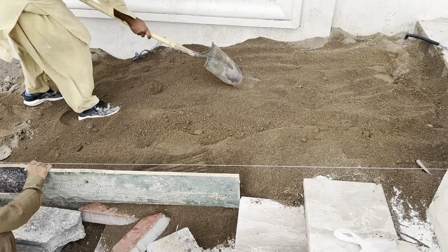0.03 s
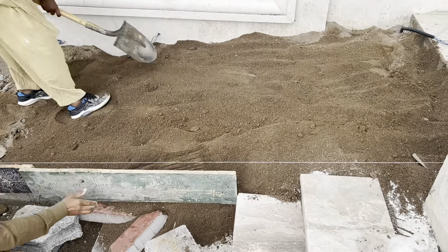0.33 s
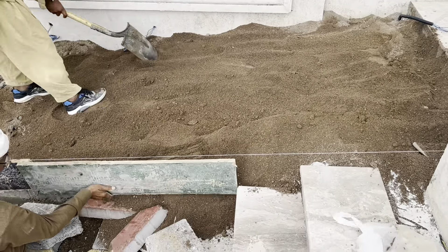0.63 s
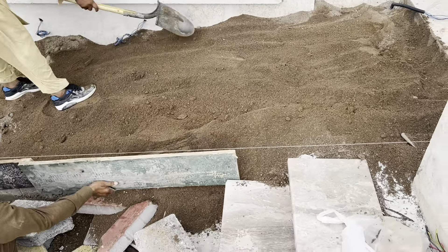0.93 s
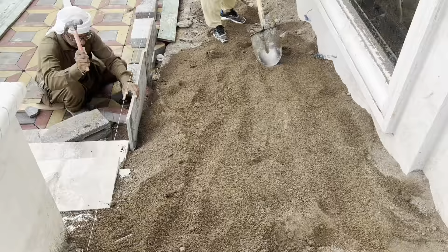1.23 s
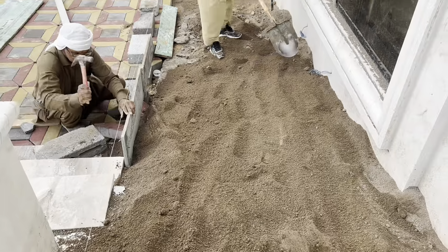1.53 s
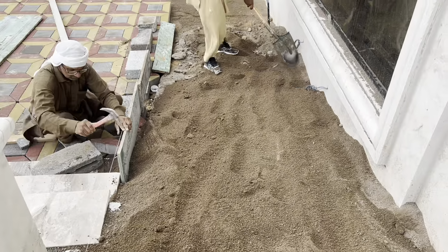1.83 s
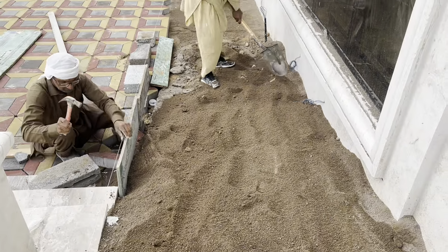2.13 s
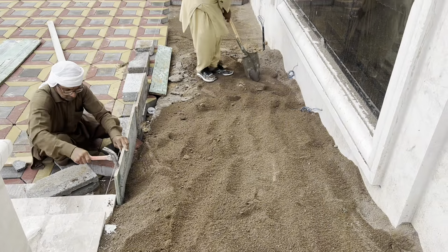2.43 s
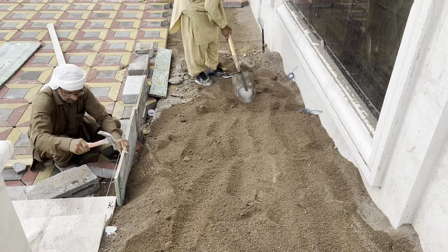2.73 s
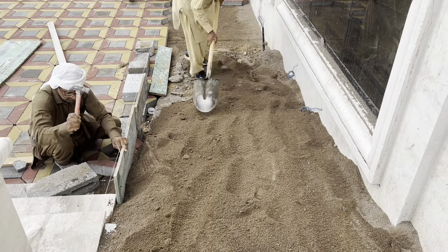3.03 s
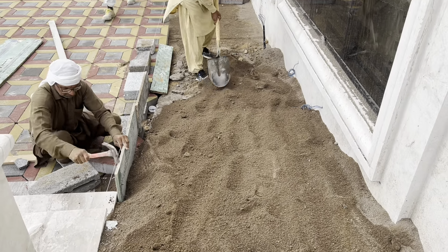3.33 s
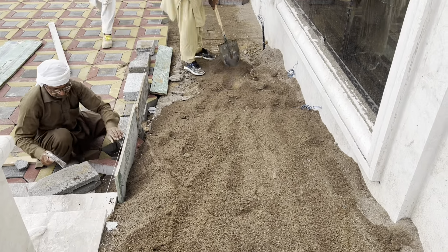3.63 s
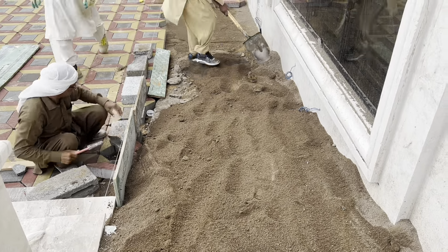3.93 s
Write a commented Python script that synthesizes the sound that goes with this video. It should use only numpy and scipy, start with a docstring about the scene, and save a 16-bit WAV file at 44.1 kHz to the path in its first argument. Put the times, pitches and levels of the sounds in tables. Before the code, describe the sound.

In a yard, wind rumbles on the microphone as a shovel scrapes sand and ticks against small stones. Then a hammer knocks a hollow board twice and five more times in a quicker run, with a slight echo.

```python
"""A yard: a hammer taps an edging board down into a sand bed. Some knocks are sharp and ring the
board's hollow modes; others are smeared, crunchy bursts with a low rumble. Behind it a shovel
scrapes and spreads sand, small stones tick on the blade and the work clunks dully. A house wall
and the yard return the sounds. Wind buffets the microphone, mostly in the first second, over a
distant wash with a faint whirr. The sound drops out once, briefly."""
import sys
import numpy as np
from scipy import signal
from scipy.fft import rfft, irfft
from scipy.io import wavfile
from scipy.ndimage import uniform_filter1d

SR = 44100
rng = np.random.default_rng(int(sys.argv[2]) if len(sys.argv) > 2 else 0)


def bounce(signal):
    """Save signal as a 16-bit WAV file at the path given by the first command-line argument."""
    frames = np.transpose(np.atleast_2d(signal))
    limited = np.clip(frames, -1, 1)
    pcm = np.round(limited * 32767).astype(np.int16)
    wavfile.write(sys.argv[1], SR, pcm)


N = 176400


def undb(db):
    """Decibels to gain."""
    return 10 ** (np.asarray(db) / 20)


def unit(x):
    """Scale to rms 1."""
    return x / np.sqrt(np.mean(x ** 2))


def curve(table):
    """Join (time_s, value) rows by straight lines."""
    return np.interp(np.arange(N) / SR, *np.array(table).T)


def noise(spectrum, alike, shared_hz=320):
    """Stereo noise, rms 1; left-right correlation is alike above shared_hz, nearing 1 below."""
    hz, db = np.array(spectrum).T
    bin_hz = np.arange(N // 2 + 1) * SR / N + 1
    gain = undb(np.interp(np.log(bin_hz), np.log(hz), db))
    correlation = 1 - (1 - alike) / (1 + (shared_hz / bin_hz) ** 4)
    white = rfft(rng.standard_normal((2, N)))
    mid, side = irfft(white * gain * np.sqrt([1 + correlation, 1 - correlation]), N)
    return unit(mid + side * np.array([[1], [-1]]))


def walk(rate_hz):
    """Smooth random wander, rms 1."""
    hold = int(SR / rate_hz)
    steps = rng.standard_normal(N)[np.arange(N) // hold]
    return unit(uniform_filter1d(steps, hold))


def pan(db):
    """Stereo gains, left louder by db."""
    return undb(np.array([[db], [-db]]) / 2)


def swell(t, rise_s, fall_s):
    """Exponential rise to a rounded top at t = 0, then exponential fall."""
    return np.exp(1 - np.hypot(1, np.where(t < 0, t / rise_s, t / fall_s)))


def background():
    """Distant outdoor wash with a faint narrow-band whirr."""
    # freq_hz, relative_db
    wash_spectrum = [(20, -38), (80, -9), (134, -0.5), (229, -5.5), (545, -11), (754, -16), (1000, -15),
                     (1440, -19), (1800, -15.5), (2100, -18), (2610, -21.5), (4600, -26), (5400, -24.5),
                     (6500, -22), (7300, -32.5), (9300, -31.5), (10400, -61), (12000, -47), (16000, -68)]
    whirr_band = signal.butter(2, [1613, 1849], "band", fs=SR, output="sos")
    whirr = unit(signal.sosfilt(whirr_band, rng.standard_normal((2, N))))
    wash = noise(wash_spectrum, alike=0.031, shared_hz=70) * undb(-50 + 0.7 * walk(6.15))
    return wash + whirr * undb(-59 + 1.2 * walk(20))


def wind(t):
    """Fluttering rumble on the microphone; stronger gusts shed higher eddies, single buffets thump."""
    # time_s, relative_db
    gusts = [(0, -36), (.09, -34.5), (.17, -35.5), (.2, -31.5), (.28, -31.5), (.34, -30), (.405, -26),
             (.445, -39), (.51, -37.5), (.56, -29.5), (.62, -45.5), (.87, -49.5), (.91, -36.5),
             (.95, -36.5), (1.03, -45.5), (1.1, -32.5), (1.2, -40), (1.5, -48), (1.8, -45), (2.0, -54.5),
             (2.88, -73), (3.2, -45), (3.36, -44), (3.47, -38.5), (3.62, -47), (3.73, -54), (4.0, -46)]
    # freq_hz, relative_db
    rumble_spectrum = [(20, -20), (45, -7), (75, 1), (105, -3.5), (140, 6), (200, -2), (300, -12.5),
                       (500, -55), (1000, -55)]
    # freq_hz, relative_db
    eddy_spectrum = [(100, -6.5), (220, -1), (330, 2.5), (480, -8), (750, -13), (1200, -25), (2500, -63)]
    # peak_s, level_db, pitch_hz, half_length_s
    buffets = [(.008, -17.5, 172, 0.0031), (.2, -21.5, 148, 0.0058), (.26, -23, 180, 0.0024),
               (0.326, -20, 110, 0.011), (.348, -13.5, 124, 0.0042), (.485, -33, 130, 0.034),
               (.555, -23, 155, 0.0083), (0.653, -22.5, 130, 0.0047), (1.002, -28, 107, 0.0083),
               (1.109, -20.5, 135, 0.0035), (1.162, -21.5, 131, 0.0038), (1.303, -30.5, 142, 0.0057),
               (2.365, -37.5, 121, 0.011), (3.022, -30.5, 196, 0.0074), (3.184, -22.5, 130, 0.011),
               (3.305, -32, 129, 0.011), (3.452, -27.5, 134, 0.0085), (3.597, -29, 99, 0.013),
               (3.827, -24, 107, 0.0098), (3.883, -25, 132.5, 0.017)]
    gust_db = curve(gusts) + 3 * walk(rate_hz=39.5)
    eddy_db = -32.5 + 1.21 * (gust_db + 30)
    out = noise(rumble_spectrum, alike=0.6, shared_hz=113) * undb(gust_db - 1)
    out += noise(eddy_spectrum, alike=0.034) * undb(eddy_db)
    turbulence_cycles = 0.09 * walk(140)
    glide = 0.18  # share of pitch lost per half length
    for peak_s, level_db, pitch_hz, half_length_s in buffets:
        u = np.clip((t - peak_s) / half_length_s, -6, 6)
        cycles = pitch_hz * half_length_s * (u - glide * u ** 2 / 2) + turbulence_cycles + rng.random()
        out += undb(level_db) * np.exp(-u ** 2) * np.sin(2 * np.pi * cycles)
    return out


def shovel(t):
    """The blade bites into sand in short strokes; grains slide off it with a hiss."""
    # peak_s, level_db, rise_s, fall_s (two time constants each), fine_share
    strokes = [(0.015, -38, 0.005, 0.016, 0.08), (.119, -46.5, .004, 0.018, 0.5), (.23, -42, 0.12, 0.12, 0),
               (.365, -55, 0.042, 0.027, 1), (.70, -54, 0.035, 0.029, 0.9),
               (0.921, -37.5, 0.019, 0.016, 0.35), (1.091, -47.5, 0.0066, 0.018, 0.5),
               (1.126, -27, 0.0023, 0.0053, 0.5), (1.134, -34, 0.0027, 0.0083, 0.7),
               (1.167, -40, .002, 0.0041, 0.2), (1.21, -42, 0.0026, 0.0069, 0.4),
               (1.218, -43, 0.0038, 0.009, 0.4), (1.53, -49, 0.043, 0.06, 0.8),
               (1.731, -35, 0.015, 0.026, 0.6), (1.859, -48, 0.023, 0.027, 0.4),
               (1.917, -41, 0.0033, 0.0099, 0.25), (2.07, -54.5, 0.028, 0.035, 0.5),
               (2.28, -51.5, 0.055, .03, 0.3), (2.349, -41, 0.012, 0.017, 0.03),
               (2.59, -50, 0.16, 0.087, 1), (2.864, -46, 0.02, 0.04, 0.2), (3.3, -56, 0.022, 0.017, 0.8),
               (3.53, -48, 0.021, 0.043, 0.55), (3.549, -35.5, 0.004, 0.0076, 0.05)]
    # freq_hz, relative_db
    blade_spectrum = [(150, 16), (350, 0.5), (700, -2), (1150, 0.5), (1550, 4), (1950, -4), (2400, 1.5),
                      (2900, -4), (5500, -7), (9000, -17), (16000, -72)]
    # freq_hz, relative_db
    fine_sand_spectrum = [(500, 16), (2000, 11), (4000, 2.5), (6500, 5.5), (9000, 4.5), (12000, -1.5),
                          (16000, -9)]
    # time_s, level_db
    slide_levels = [(0, -61.5), (.105, -52.5), (.125, -51), (.21, -49), (.38, -45.5), (.47, -50),
                    (.62, -53), (.71, -49.5), (.77, -60), (1.2, -59.5), (1.5, -52), (1.8, -110)]
    # freq_hz, relative_db
    slide_spectrum = [(300, 12), (1200, -5), (2500, -1.5), (4000, 1.5), (6500, 0.5), (9000, -0.5),
                      (12000, -10.5), (16000, -15.5)]
    grains = unit(undb(1.5 * walk(rate_hz=3000)))
    blade = noise(blade_spectrum, alike=0.22)
    fine_sand = noise(fine_sand_spectrum, alike=0.082)
    out = noise(slide_spectrum, alike=0.056) * undb(curve(slide_levels))
    for peak_s, level_db, rise_s, fall_s, fine_share in strokes:
        scrape = np.sqrt(1 - fine_share) * blade + np.sqrt(fine_share) * fine_sand
        out += undb(level_db) * swell(t - peak_s, rise_s / 2, fall_s / 2) * scrape
    return out * grains * pan(db=0.5)


def stones():
    """Small stones tick against the blade as it is pushed through the sand."""
    # time_s, level_db
    grating_levels = [(0, -70), (.016, -48), (.04, -61), (.11, -55), (.19, -57), (.27, -48), (.33, -61),
                      (.45, -59), (.6, -62), (.8, -110)]
    # freq_hz, relative_db
    tick_spectrum = [(500, -3), (1400, -0.5), (2300, -2), (3800, -3), (5200, -11), (8000, -15),
                     (11000, -21), (16000, -36)]
    ticks_per_s, fall_s = 260, 0.0005
    ticks = (rng.random(N) < ticks_per_s / SR) * rng.exponential(size=N)
    bursts = signal.lfilter([1], [1, -np.exp(-1 / (fall_s * SR))], ticks)
    return noise(tick_spectrum, alike=0.1) * unit(bursts) * undb(curve(grating_levels))


def yard_echo(x, t):
    """Scattered echo from the house wall plus a thin, diffuse open-air tail."""
    # freq_hz, relative_db
    echo_spectrum = [(30, -27), (100, 10), (300, -20), (450, -1), (700, -1.5), (950, 0.5), (1300, 4.5),
                     (1600, 3.5), (1900, -4.5), (2400, 0.5), (3100, -3), (5000, -5), (9000, -4),
                     (16000, -18)]
    t60_s, build_s, wall_delay_s, wall_spread_s = 0.36, 0.047, 0.026, 0.009
    half_decay = undb(-60 * t / t60_s / 2)  # applied before and after smoothing
    bins = rfft(noise(echo_spectrum, alike=0.054) * half_decay)
    magnitude = uniform_filter1d(np.abs(bins), size=400)  # no pitch stands out
    diffuse = irfft(magnitude * np.exp(1j * np.angle(bins)), N)
    tail = diffuse * half_decay * (1 - np.exp(-t / build_s))
    wall = noise(echo_spectrum, alike=0.026) * np.exp(-((t - wall_delay_s) / wall_spread_s) ** 2 / 2)
    response = (undb(-20) * unit(tail) + undb(-17) * unit(wall)) / np.sqrt(N)
    return signal.fftconvolve(x, response, axes=1)[:, :N]


def clunks(t):
    """Dull bumps and scuffs of the work, damped at once."""
    # peak_s, level_db, fall_s
    bumps = [(0.129, -29.5, 0.013), (0.197, -27, 0.012), (0.3, -29, 0.0036), (0.352, -23, 0.0045),
             (0.391, -27.5, 0.0035), (0.559, -34.5, 0.017), (0.654, -38.5, 0.0053), (0.919, -37.5, 0.0058),
             (1.096, -29, 0.0057), (1.167, -30.5, 0.012), (1.303, -24.5, 0.0054), (3.551, -29.5, 0.004)]
    # freq_hz, relative_db
    bump_spectrum = [(40, -27), (140, -0.5), (300, 6.5), (450, 3), (650, -2), (900, -13.5), (1600, -32),
                     (3000, -36), (8000, -55), (16000, -67)]
    envelope = sum(undb(db) * swell(t - peak_s, 0.002, fall_s) for peak_s, db, fall_s in bumps)
    return noise(bump_spectrum, alike=0.24) * envelope


def board(age_s, pitch_ratio):
    """Damped modes of the struck board; neighbours swing oppositely and sum to one tight knock."""
    # freq_hz, level_db, t60_s
    modes = [(244, -4.5, 0.042), (348, 8, 0.039), (433.5, 4.5, 0.027), (648, -6.5, 0.027), (917, -9, 0.016),
             (1234, -8.5, 0.023), (1772, -7, 0.016), (2002, -4.5, 0.017), (2764, -17, 0.038),
             (3143, -15.5, 0.031), (3680, -34, 0.034), (4520, -19.5, 0.028), (5530, -19.5, 0.022)]
    right_lag_s, swell_cycles = 0.00012, 1.45
    age_s = np.maximum([age_s, age_s - right_lag_s], 0)
    out = 0
    for k, (hz, level_db, t60_s) in enumerate(modes):
        scatter_db = 2 * rng.standard_normal() * (hz > 1000)  # upper modes vary with the strike point
        attack = 1 - np.exp(-(age_s * hz / swell_cycles) ** 2)
        envelope = attack * undb(level_db + scatter_db - 60 * age_s / t60_s)
        out += (-1) ** k * envelope * np.sin(2 * np.pi * hz * pitch_ratio * age_s)
    return out * pan(db=1.2)


def hammer(t):
    """Each knock: contact crack, hollow board ring, thin after-ring; a gritty noise swell around it."""
    # start_s, ring_db, pitch_ratio, crack_db, crunch_db, rumble_db, rumble_fall_s, grit_db,
    # after_ring_db, smear_offset_s, smear_correlation
    blows = [(1.3699, -22, 1.11, -27.5, -24, -18.5, 0.01, -33.5, -62, 0.0041, -0.21),
             (1.629, -11, 1.037, -23.5, -27.5, -29, 0.016, -55, -63, -0.0013, 0.25),
             (2.461, -23, 1.05, -41, -23, -22, .017, -32.5, -45, 0.0091, -0.16),
             (2.7126, -9.5, 1, -17.5, -24.5, -31.5, 0.017, -46, -36.5, 0.0041, -0.24),
             (2.943, -10.5, 0.984, -20.5, -31.5, -21.5, 0.014, -43.5, -59, 0.004, 0.48),
             (3.173, -9, 0.97, -18, -26.5, -24.5, 0.013, -39, -62, 0.00091, 0.63),
             (3.373, -32.5, 1.2, -55, -22.5, -20, 0.0081, -44, -62, 0.012, -0.19)]
    # freq_hz, relative_db
    crack_spectrum = [(30, -38), (200, 8.5), (600, 0.5), (1000, -1), (1450, -2), (1750, 2), (2050, 3),
                      (2400, -25.5), (2800, -4.5), (3200, -8.5), (3900, -9.5), (4600, -12.5), (5600, -10.5),
                      (7000, -17), (9000, -19.5), (12000, -27), (16000, -34)]
    # freq_hz, relative_db
    crunch_spectrum = [(30, -26), (200, -25), (430, -25), (540, 7), (660, 3), (820, -13.5), (1000, 2),
                       (1300, 0.5), (1550, 0), (1750, -1), (2000, 0), (2400, -6.5), (3100, -10),
                       (3700, -12.5), (4500, -21), (5700, -17), (7000, -25.5), (9000, -24.5), (12000, -42),
                       (16000, -41)]
    # freq_hz, relative_db
    rumble_spectrum = [(30, -35), (190, -47), (255, -2), (300, -11.5), (365, 4), (415, -8), (480, -14.5),
                       (600, -14.5), (900, -17.5), (3000, -79)]
    # freq_hz, relative_db
    grit_spectrum = [(300, -28), (3700, -21), (4450, 1), (5100, -1.5), (5450, -1), (5680, 5.5), (5950, 0),
                     (6500, -6), (7500, -14), (10000, -20.5), (16000, -24)]
    crack_hold_s, crack_fall_s = 0.0014, 0.0037
    after_ring_hz, after_ring_t60_s = 1525, 0.33
    crack = noise(crack_spectrum, alike=0.49) * pan(db=2)
    crunch = noise(crunch_spectrum, alike=0, shared_hz=0) * undb(0.82 * walk(1200))
    rumble = noise(rumble_spectrum, alike=0, shared_hz=0)
    grit = noise(grit_spectrum, alike=0, shared_hz=0) * unit(undb(5 * walk(2000)))
    out = np.zeros((2, N))
    for (start_s, ring_db, pitch_ratio, crack_db, crunch_db, rumble_db, rumble_fall_s, grit_db,
         after_ring_db, smear_offset_s, alike) in blows:
        near = np.abs(t - start_s) < 0.2
        age_s = t[near] - start_s
        ring = undb(ring_db) * board(age_s, pitch_ratio)
        contact = undb(crack_db) * crack[:, near] * (age_s >= 0)
        contact *= np.exp(-np.maximum(age_s - crack_hold_s, 0) / crack_fall_s)
        gritty = undb(crunch_db) * crunch[:, near] + undb(grit_db) * grit[:, near]
        gritty *= swell(age_s - smear_offset_s, rise_s=0.0065, fall_s=0.0079)
        low = undb(rumble_db) * rumble[:, near] * swell(age_s - smear_offset_s, 0.0058, rumble_fall_s)
        mid, side = gritty + low
        smear = np.sqrt((1 + alike) / 2) * mid + np.sqrt((1 - alike) / 2) * side * np.array([[1], [-1]])
        after_ring = (age_s >= 0) * np.sin(2 * np.pi * after_ring_hz * age_s)
        after_ring *= undb(after_ring_db - 60 * age_s / after_ring_t60_s)
        out[:, near] += contact + ring + smear * pan(db=1) + after_ring
    return signal.sosfilt(signal.butter(1, 70, "high", fs=SR, output="sos"), out)


def scene():
    """The work and its echo, with wind and background."""
    t = np.arange(N) / SR
    work = hammer(t) + shovel(t) + stones() + clunks(t)
    return work + yard_echo(work, t) + wind(t) + background()


def record(dry):
    """One brief dropout, then a steep low-pass."""
    gap_start_s, gap_end_s, gap_db, cutoff_hz = 1.242, 1.273, -29, 16000
    t = np.arange(N) / SR
    in_gap = (t > gap_start_s) & (t < gap_end_s)
    gain = uniform_filter1d(np.where(in_gap, undb(gap_db), 1.0), size=90)
    return signal.sosfilt(signal.ellip(8, 0.2, 80, cutoff_hz, fs=SR, output="sos"), dry * gain)


dry = scene()
out = record(dry)
bounce(out)
```